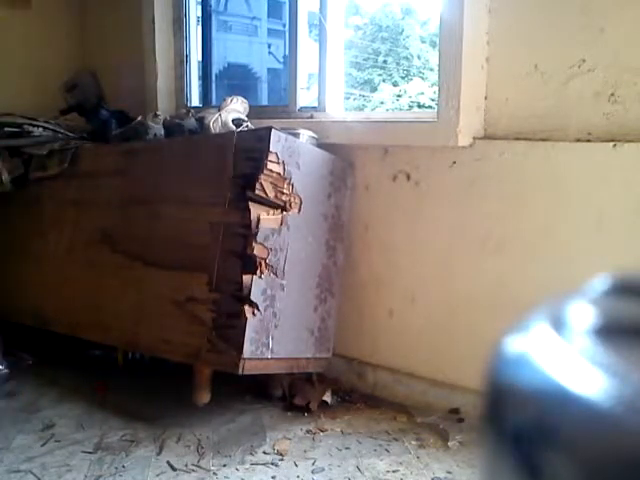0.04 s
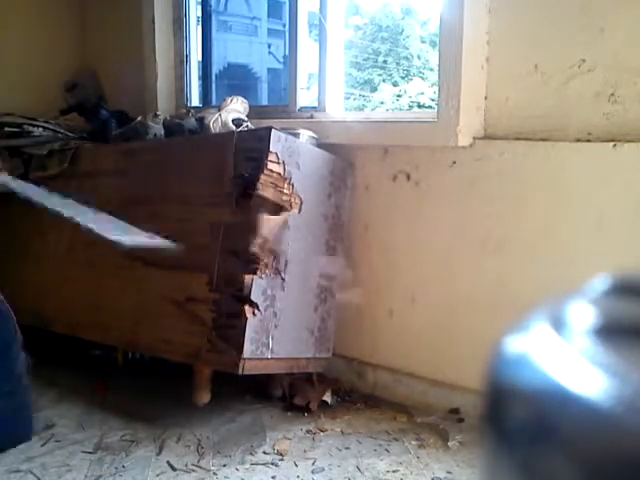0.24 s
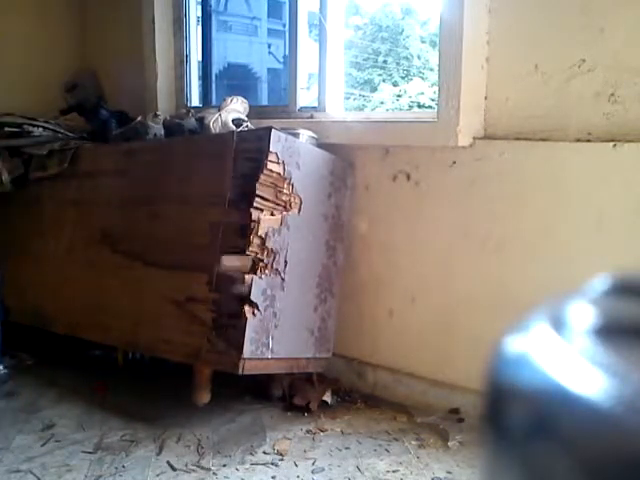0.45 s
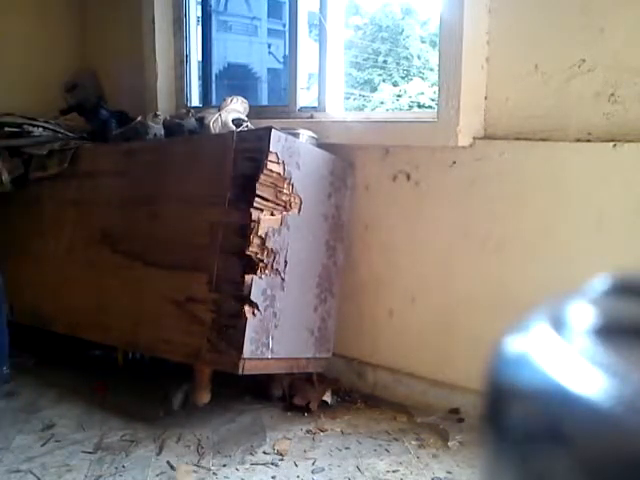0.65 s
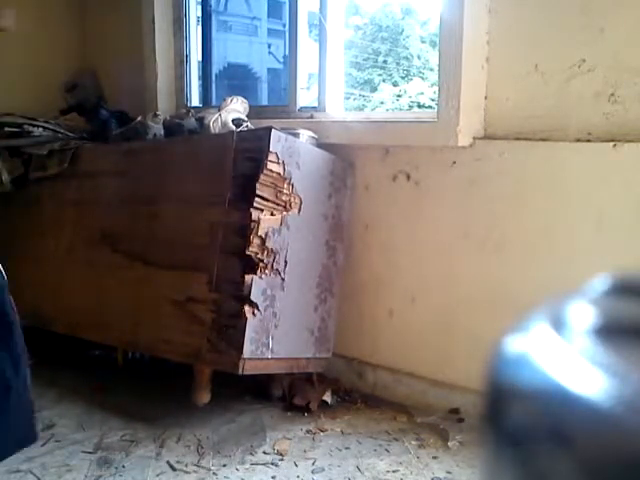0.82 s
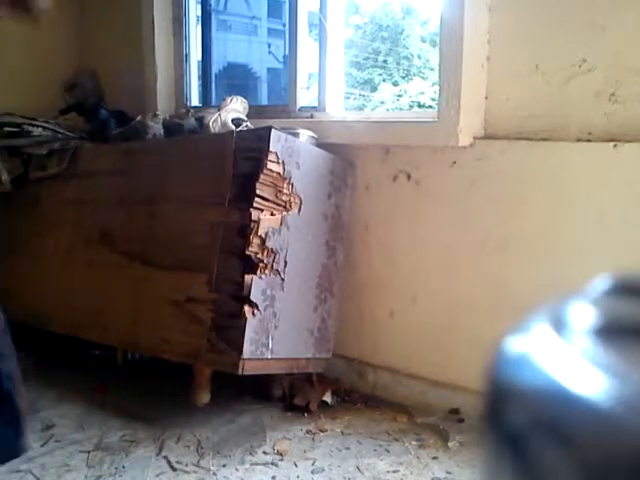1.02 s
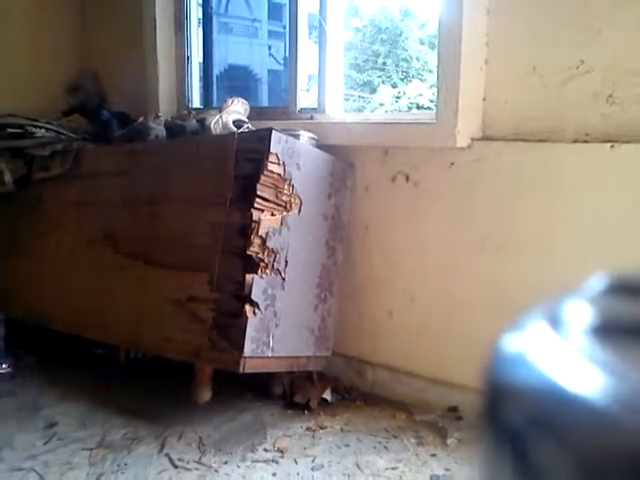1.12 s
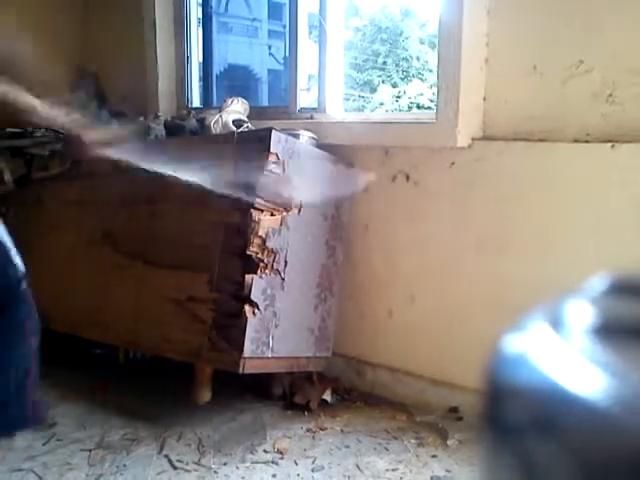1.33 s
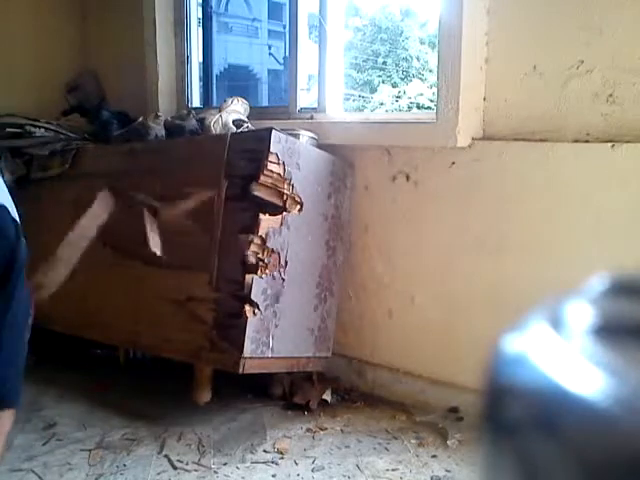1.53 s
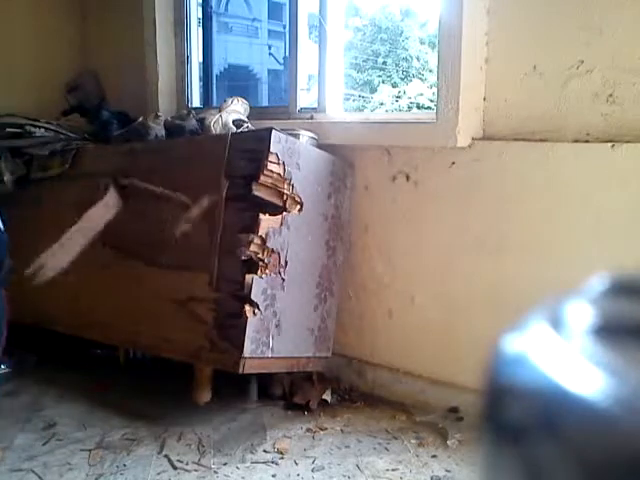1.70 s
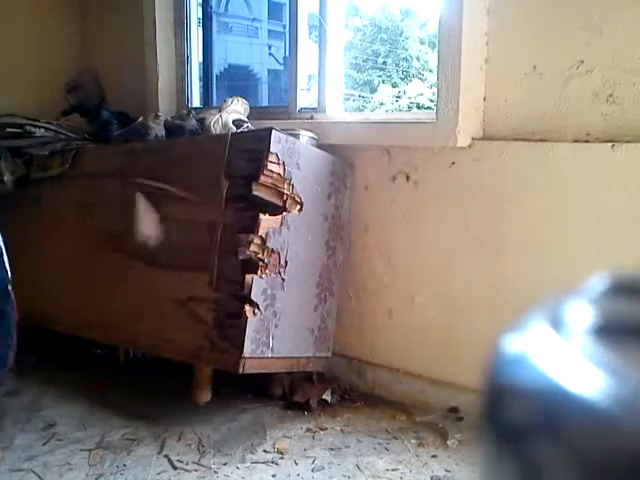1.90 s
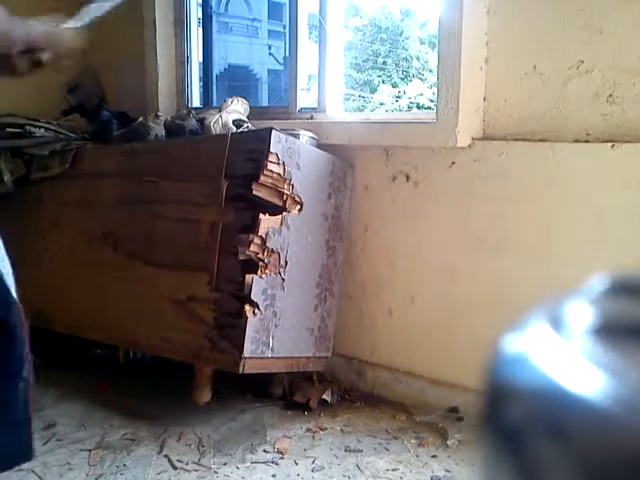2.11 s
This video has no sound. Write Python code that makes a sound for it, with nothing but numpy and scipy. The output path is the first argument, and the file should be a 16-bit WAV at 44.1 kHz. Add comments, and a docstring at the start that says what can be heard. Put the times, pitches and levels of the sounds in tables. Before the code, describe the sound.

A wooden cabinet is smashed twice with booming cracks, after a sharp clack, in a bare room.

```python
"""A sharp wooden clack rings out over a faint, insect-like trill in a bare, echoing room.
Then two heavy blows smash a wooden cabinet, with a scuff on the floor before the second.
Each blow cracks, booms and sheds splinters. Pieces snap off,
loose boards knock and chips land, while the trill carries on behind.
The recorder cuts the treble, turns the bangs down and overloads on the hardest crack."""
import sys
import numpy as np
from scipy import signal
from scipy.fft import rfft, irfft, next_fast_len
from scipy.io import wavfile
from scipy.ndimage import uniform_filter1d, minimum_filter1d

SR = 44100
rng = np.random.default_rng(int(sys.argv[2]) if len(sys.argv) > 2 else 0)


def unload_wav(signal):
    """Save mono or channel-first audio to the path in sys.argv[1] as 16-bit WAV at rate SR, clipped to [-1, 1]."""
    wavfile.write(
        sys.argv[1],
        SR,
        np.round(np.clip(np.atleast_2d(signal).T, -1, 1) * 32767).astype(np.int16),
    )


N = 94815
T = np.arange(N) / SR
FRAME = 16384  # samples in a tone filter
FRAME_HZ = np.maximum(np.arange(FRAME // 2 + 1) * SR / FRAME, 1)

# How long the room echoes: (frequency [Hz], time to fade by 60 dB [s])
ROOM_DECAY = [(60, 0.88), (130, 0.93), (250, 1), (500, 0.71), (1000, 0.56), (2000, 0.56), (4000, 0.38)]
# Tone of the room's hush: (frequency [Hz], relative level [dB])
AIR_TONE = [(25, -8), (70, -6.5), (130, -10), (250, 5), (500, -1), (1000, -8), (2000, -14), (2800, -11),
            (4000, -27)]
# How the trill swells and sinks: (time [s], level [dB])
TRILL_LEVELS = [(0, -52.5), (.2, -57), (.6, -41), (.72, -40.5), (.87, -37.5), (.97, -48.5), (1.02, -44.5),
                (1.11, -56), (1.23, -50.5), (1.28, -55.5), (1.7, -50), (1.87, -45.5), (2.0, -42),
                (2.15, -45)]
# Weight shifting: (time [s], level [dB])
THUMPS = [(0.010, -42.5), (0.115, -47), (0.545, -30), (0.78, -39.5), (1.152, -41), (1.205, -34.5),
          (1.345, -34.5), (1.685, -24), (1.81, -35), (1.925, -38.5)]
# Tone of a thump: (frequency [Hz], relative level [dB])
THUMP_TONE = [(40, -27), (95, -20), (125, 0.5), (160, -5), (220, -14.5), (350, -20.5), (700, -32.5),
              (2000, -42)]
# Scuffs on the floor: (loudest moment [s], rise [s], fall [s], level [dB])
SCUFFS = [(1.365, .03, 0.027, -32.5), (1.425, 0.044, 0.09, -38), (2.071, 0.06, 0.02, -40.5)]
# Tone of a scuff: (frequency [Hz], relative level [dB])
SCUFF_TONE = [(80, -23.5), (250, 2.5), (500, -7), (800, 0), (1100, -4), (1500, -18.5), (2600, -16.5),
              (4000, -22)]
# Chips landing: (time [s], level [dB])
CHIPS = [(0.600, -39), (0.648, -40.5), (0.690, -31), (0.732, -42.5), (0.843, -34.5), (0.872, -62),
         (0.965, -41), (1.645, -26), (1.885, -37.5), (1.943, -47), (2.026, -38.5)]
# Tone of chips and splinters: (frequency [Hz], relative level [dB])
SPLINTER_TONE = [(100, -28.5), (300, -4), (600, 2.5), (1100, -4.5), (2200, 2), (3200, -1), (4000, -5.5)]
# Loose boards knocking: (time [s], level [dB])
RATTLES = [(0.545, -29.5), (0.685, -35), (0.775, -37), (1.795, -38.5), (1.860, -38), (1.920, -34),
           (1.975, -38)]
# Tone of those knocks: (frequency [Hz], relative level [dB])
RATTLE_TONE = [(80, -24.5), (150, -8), (210, 0), (300, -4.5), (420, -12.5), (560, -11), (900, -23),
               (3000, -36)]
# The quick hits that make up the clack: (time [s], level [dB])
CLACK_HITS = [(0.200, -30), (0.212, -18), (0.224, -31)]
# Tone of the clack: (frequency [Hz], relative level [dB])
CLACK_TONE = [(100, -40), (400, -18.5), (650, -9.5), (850, 1), (1400, -2), (2300, 3), (3000, -2),
              (4000, -11)]
# Notes of the clacking board: (frequency [Hz], relative level [dB], time to fade by 60 dB [s])
BOARD_NOTES = [(793, 10, .3), (859, -13, 0.62), (1073, -12, .3), (1260, -6, 0.36), (1322, -30.5, .35),
               (1650, 1.5, 0.16), (2344, -8.5, 0.39), (2458, -11, 0.28)]
# Pieces tearing off: (time [s], snap level [dB], thud level [dB])
BREAKS = [(0.385, -15, -18), (0.412, -11.5, -12.5), (0.437, -14, -15.5), (0.452, -29, -16.5),
          (1.524, -19, -24), (1.551, -31, -24.5), (1.598, -28.5, -20.5), (1.628, -20, -27.5),
          (1.648, -26, -30.5)]
# Tone of a snap: (frequency [Hz], relative level [dB])
SNAP_TONE = [(100, -13), (300, -4), (550, 6.5), (1000, 0), (1500, -1), (2200, 4.5), (3200, -8.5),
             (4000, -4.5)]
# Tone of the thuds and the low swell: (frequency [Hz], relative level [dB])
THUD_TONE = [(40, -17), (80, -16), (125, 4.5), (180, 6), (300, -3.5), (500, 4.5), (800, -10.5),
             (2000, -17.5)]
# Notes of the cabinet panels: (frequency [Hz], relative level [dB], time to fade by 60 dB [s])
PANEL_NOTES = [(114.6, -16, 2), (127.7, -2, 0.8), (135, -9.5, 0.25), (173.2, -3.5, .45),
               (191.5, -10.5, 0.23), (216.8, -11, 0.6), (238, -15.5, 1.1), (393, -16, 0.53),
               (514, -14.5, 0.37), (565, -8, .6)]
# Tone of a crack: (frequency [Hz], relative level [dB])
CRACK_TONE = [(60, -2), (170, 5.5), (400, 5), (1000, -5.5), (2000, -5), (3000, -2.5), (4000, 2)]
# Tone of a bang: (frequency [Hz], relative level [dB])
BANG_TONE = [(30, -12), (60, -6), (95, -0.5), (125, 3.5), (180, 11.5), (300, 5.5), (550, 1.5), (900, 4),
             (1400, 0.5), (2300, -2.5), (3200, -3.5), (4000, -13.5)]
# The two blows: (time [s], bang [dB], crack [dB], panel boom [dB], hollow ring boost [dB],
# splinters [dB], splintering length [s], contact fade time [s])
BLOWS = [(0.348, -9, -5.5, -13.5, 7.5, -12.5, .11, .012), (1.490, -6, 6, -10, 1.5, -23.5, 0.16, 0.0072)]


def from_db(db):
    """Turn decibels into a number to multiply by."""
    return 10 ** (np.asarray(db) / 20)


def rms_one(x):
    """Scale a signal to an average power of one."""
    return x / np.sqrt(np.mean(x ** 2) + 1e-20)


def at_hz(points, hz):
    """Read between the rows of a table, with octaves evenly spaced."""
    frequencies, values = np.transpose(points)
    return np.interp(np.log(hz), np.log(frequencies), values)


def convolve(x, response):
    """Play x through a response, such as a room's echo."""
    return signal.fftconvolve(x, response)[:N]


def colour(x, tone, extra_db=0):
    """Give x a tone, using a filter that keeps the power of white noise."""
    gains = rms_one(from_db(at_hz(tone, FRAME_HZ) + extra_db))
    cepstrum = irfft(np.log(gains))
    # Folding this in half makes the filter ring only after a hit, never before.
    cepstrum[1:FRAME // 2] *= 2
    cepstrum[FRAME // 2 + 1:] = 0
    return convolve(x, irfft(np.exp(rfft(cepstrum))))


def high_pass(x, hz):
    """Turn down everything lower than hz."""
    return signal.sosfilt(signal.butter(2, hz, "high", fs=SR, output="sos"), x)


def drift(hz):
    """A random wobble, mostly slower than hz."""
    size = 2 * next_fast_len(N, True)
    frequencies = np.maximum(np.arange(size // 2 + 1) * SR / size, 1)
    spectrum = rfft(rng.standard_normal(size)) / (1 + (frequencies / hz) ** 4)
    return rms_one(irfft(spectrum)[:N])


def clicks(rows):
    """One click for each (time [s], level [dB])."""
    track = np.zeros(N)
    for s, db in rows:
        track[int(np.clip(s * SR, 0, N - 1))] += from_db(db)
    return track


def ticks(per_s):
    """Clicks of random size at random times."""
    return (rng.random(N) < per_s / SR) * rng.standard_normal(N)


def burst(envelope):
    """Wood fibres being crushed: noise that swells and fades with the envelope."""
    x = rng.standard_normal(N) * envelope
    live = envelope > 1e-3
    for _ in range(3):  # even out the frequencies, then restore the swell and fade
        flat_spectrum = np.exp(1j * np.angle(rfft(x[live])))
        x[live] = irfft(flat_spectrum, live.sum()) * np.sqrt(envelope[live])
    return rms_one(x * live) / np.sqrt(N)


def fade(s, hold_s, fade_s):
    """Start suddenly at time s, hold, then die away."""
    return (T >= s) * np.exp(-np.clip((T - s - hold_s) / fade_s, 0, 20))


def ringing(notes):
    """Struck wood rings with several notes, each fading at its own speed."""
    return sum(from_db(db - 60 * T / t60) * np.sin(2 * np.pi * hz * T) for hz, db, t60 in notes)


def room(decay_scale=1):
    """Direct sound plus a dense echo; each call is like a different spot in the room."""
    build_s, direct_db = 0.0034, -14.5
    t, hz = np.arange(FRAME) * 4 / SR, FRAME_HZ / 4  # built at a quarter of the sample rate
    edges = np.r_[0, np.geomspace(70, 5000, 15), SR][:, None]
    low, high = edges[:-1], edges[1:]
    bands = irfft(rfft(rng.standard_normal(FRAME)) * (hz >= low) * (hz < high))
    swell = uniform_filter1d(bands ** 2, size=400, axis=1) / np.mean(bands ** 2, axis=1, keepdims=True)
    steady_bands = bands / np.sqrt(np.abs(swell) + 1e-6)
    decay = np.exp(-np.log(1000) * t / (decay_scale * at_hz(ROOM_DECAY, (low + high) / 2)))
    tail = np.sum(steady_bands * decay, axis=0) * (1 - np.exp(-t / build_s))
    response = signal.resample_poly(tail, 4, 1) / 2
    response[0] += from_db(direct_db) * 2 * np.sqrt(np.sum(tail ** 2))
    return response


def in_room(x, tone, decay_scale=1):
    """Add the room's echo to x and give it a tone."""
    return colour(convolve(x, room(decay_scale)), tone)


def air():
    """The room's faint, steady hush."""
    return from_db(-50.5) * colour(rng.standard_normal(N), AIR_TONE)


def trill():
    """A high, insect-like note that wavers and throbs."""
    pitch_hz, wander_hz = 2625, 19
    throb_period_s, throb_peak_s = 0.054, 0.70
    phase = 2 * np.pi * np.cumsum(pitch_hz + wander_hz * drift(11)) / SR
    roughness = drift(44) * np.sin(phase) + drift(60) * np.cos(phase)
    note = np.sin(phase) + 0.82 * roughness
    throb = 1 + 0.42 * np.cos(2 * np.pi * (T - throb_peak_s) / throb_period_s)
    level = from_db(np.interp(T, *np.transpose(TRILL_LEVELS)))
    return level * rms_one(note * throb)


def thumps():
    """Shifting weight makes dull thumps."""
    return in_room(clicks(THUMPS), THUMP_TONE, decay_scale=0.55)


def scuffs():
    """Something rubs over the floor in short swells of noise."""
    level = sum(from_db(db) / np.sqrt(1 + ((T - s) / np.where(T < s, rise, fall)) ** 4)
                for s, rise, fall, db in SCUFFS)
    return level * colour(rng.standard_normal(N), SCUFF_TONE)


def settling():
    """Splintered wood goes on ticking ever more faintly after each blow."""
    start_db, fall_db_per_s = -36, 20.5
    level = sum(from_db(start_db - fall_db_per_s * np.abs(T - s)) * (T > s) for s, *_ in BLOWS)
    return level * rms_one(in_room(ticks(per_s=230), SPLINTER_TONE, decay_scale=0.55))


def chips():
    """Wood chips land, each with one small click."""
    return in_room(clicks(CHIPS), SPLINTER_TONE)


def rattles():
    """Loosened boards knock against the cabinet's hollow frame."""
    return in_room(clicks(RATTLES), RATTLE_TONE, decay_scale=0.45)


def clack():
    """A loose board takes three quick hits and rings from the last."""
    knocks = in_room(clicks(CLACK_HITS), CLACK_TONE, decay_scale=0.8)
    ring = convolve(clicks(CLACK_HITS[-1:]), ringing(BOARD_NOTES))
    return knocks + from_db(-0.5) * high_pass(ring, hz=400)


def low_swell():
    """A soft, low rush of noise swells into each blow and fades after it."""
    swell_s = 0.016
    swell = sum(np.exp(-np.abs(T - s) / swell_s) for s, *_ in BLOWS)
    return from_db(-24.5) * swell * colour(rng.standard_normal(N), THUD_TONE)


def breaks():
    """Each piece snaps off with a short crunch and jolts the frame."""
    snaps = sum(from_db(db) * burst(fade(s, hold_s=0, fade_s=0.0023)) for s, db, _ in BREAKS)
    jolts = clicks([(s, db) for s, _, db in BREAKS])
    return in_room(snaps, SNAP_TONE, decay_scale=0.48) + in_room(jolts, THUD_TONE, decay_scale=0.51)


def panels(s, boom_db):
    """A brief low pulse swells around the hit, and the panels boom with their own notes."""
    pulse_s, pulse_hz, pulse_db = 0.012, 177.3, -14.5
    low_pulse = np.exp(-0.5 * ((T - s) / pulse_s) ** 2) * np.cos(2 * np.pi * pulse_hz * (T - s))
    boom = convolve(clicks([(s, boom_db)]), ringing(PANEL_NOTES))
    return from_db(pulse_db) * low_pulse + high_pass(boom, hz=120)


def crack(s):
    """Fibres tear in one short burst as the panel gives way."""
    delay_s, half_width_s = 0.010, 0.0091
    tearing = np.exp(-0.5 * np.minimum(np.abs(T - s - delay_s) / half_width_s, 5) ** 4)
    return colour(burst(tearing), CRACK_TONE) * np.sqrt(2 * half_width_s * SR)


def blow(s, bang_db, crack_db, boom_db, hollow_db, splinter_db, splinter_s, contact_s):
    """One heavy hit: the hollow cabinet bangs, cracks and splinters, and the room answers."""
    hollow_hz, width_octaves = 524, 0.2
    echo = room()
    hollow_boost = hollow_db * np.exp(-0.5 * (np.log2(FRAME_HZ / hollow_hz) / width_octaves) ** 2)
    contact = burst(fade(s, hold_s=0, fade_s=contact_s))
    bang = from_db(bang_db) * colour(convolve(contact, echo), BANG_TONE, hollow_boost)
    tear = from_db(crack_db) * crack(s)
    snaps = rms_one(ticks(per_s=260) * fade(s, hold_s=splinter_s, fade_s=0.014)) / np.sqrt(N)
    splinters = from_db(splinter_db) * colour(convolve(snaps, echo), SPLINTER_TONE)
    return bang + tear + splinters + panels(s, boom_db)


def scene():
    """Everything in the room, heard at one microphone."""
    hush = air()
    smash = sum(blow(*row) for row in BLOWS) + breaks()
    small_sounds = settling() + clack() + chips() + thumps() + scuffs()
    return (hush + trill() + small_sounds + rattles() + low_swell() + smash)[None]


def limiter(x):
    """Turn loud peaks down quickly, then let the level come back slowly."""
    threshold_db, cut_share, attack_s, release_db_per_s = -4.5, 0.62, 0.006, 73.5
    cut_db = cut_share * np.maximum(20 * np.log10(np.abs(x) + 1e-9) - threshold_db, 0)
    held_db = np.maximum.accumulate(cut_db + release_db_per_s * T) - release_db_per_s * T
    smoothing = np.exp(-1 / (attack_s * SR))
    return x * from_db(-signal.lfilter([1 - smoothing], [1, -smoothing], held_db))


def catch_peaks(x, ceiling):
    """Look ahead and turn small overshoots down; bigger ones still pass the ceiling."""
    most_cut_db = 2
    gain = np.clip(0.98 * ceiling / (np.abs(x) + 1e-9), from_db(-most_cut_db), 1)
    gain = minimum_filter1d(gain, size=181)
    return x * uniform_filter1d(uniform_filter1d(gain, size=91), size=91)


def record(dry):
    """The recorder cuts deep bass and treble, holds the bangs down and clips what is still too loud."""
    treble_hz, stop_hz, final_stop_hz, ceiling = 3000, 5260, 15800, 0.667
    x = high_pass(dry[0], hz=62)
    x = signal.sosfilt(signal.butter(8, treble_hz, fs=SR, output="sos"), x)
    x = signal.sosfilt(signal.cheby2(12, 70, stop_hz, fs=SR, output="sos"), x)
    x = np.clip(catch_peaks(limiter(x), ceiling), -ceiling, ceiling)
    return signal.sosfilt(signal.cheby2(12, 70, final_stop_hz, fs=SR, output="sos"), x)[None]


dry = scene()
out = record(dry)
unload_wav(out)
```